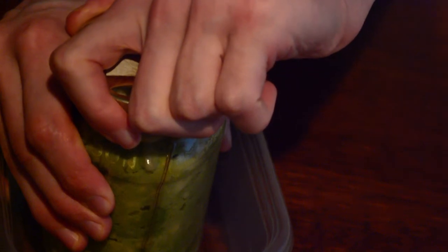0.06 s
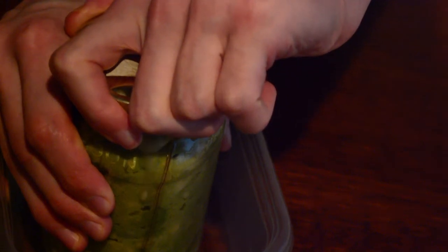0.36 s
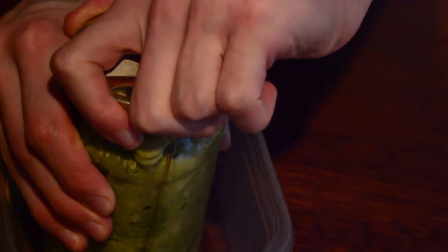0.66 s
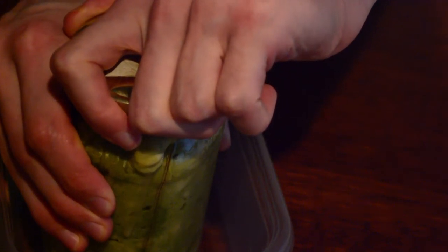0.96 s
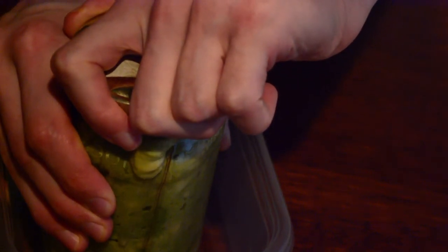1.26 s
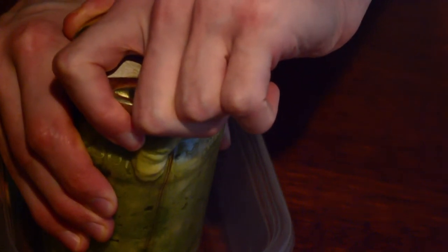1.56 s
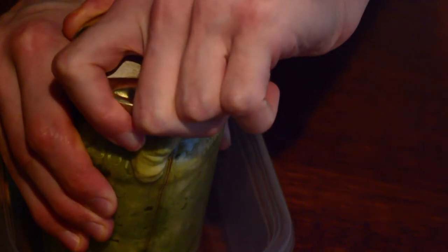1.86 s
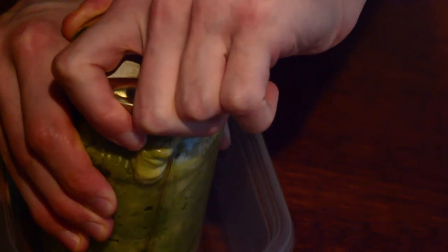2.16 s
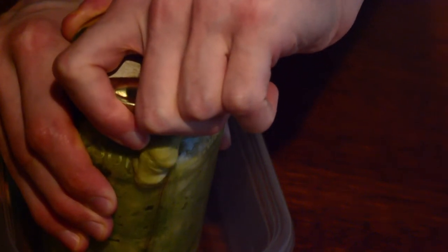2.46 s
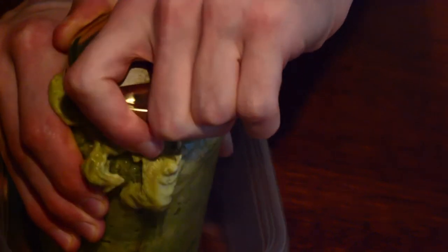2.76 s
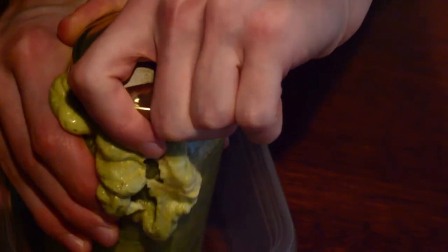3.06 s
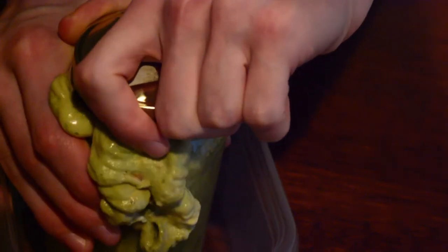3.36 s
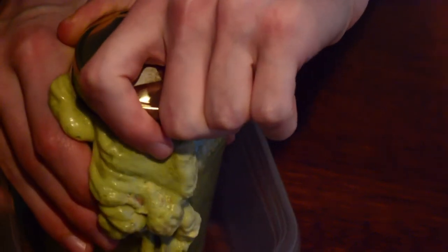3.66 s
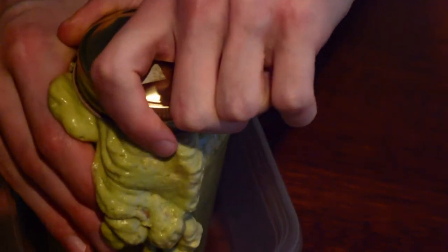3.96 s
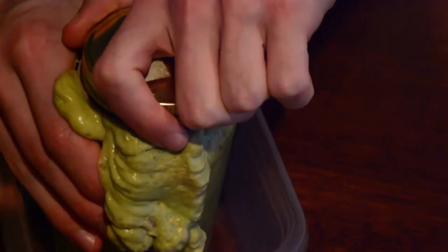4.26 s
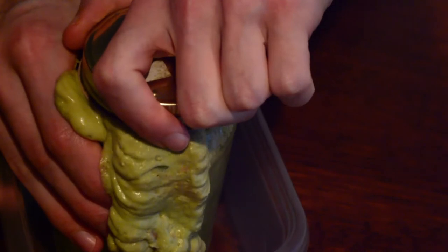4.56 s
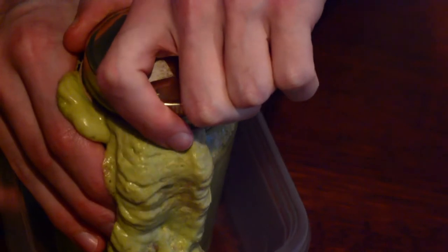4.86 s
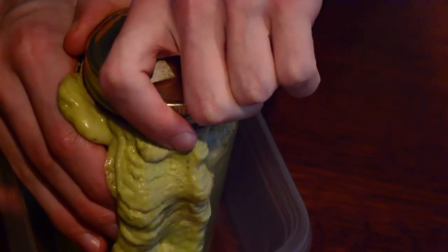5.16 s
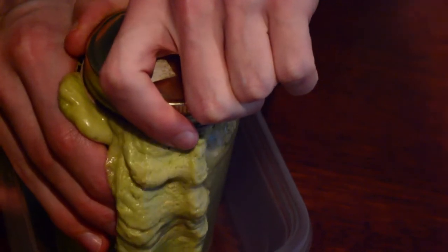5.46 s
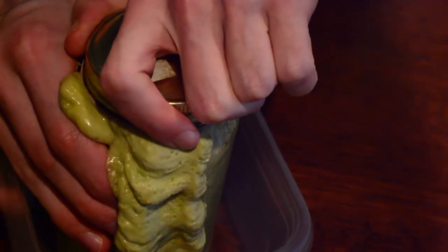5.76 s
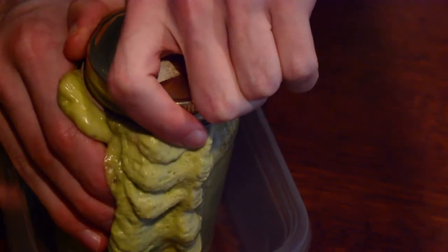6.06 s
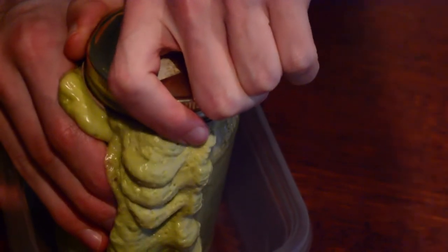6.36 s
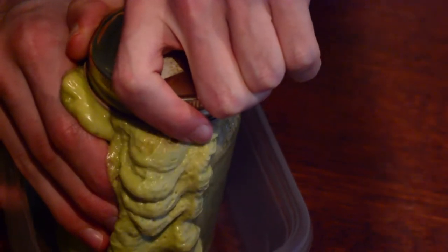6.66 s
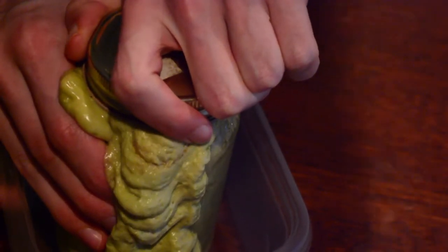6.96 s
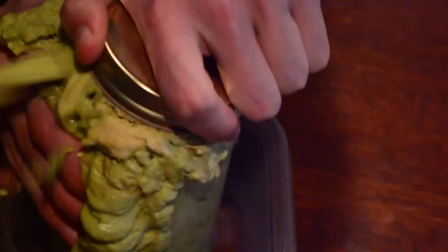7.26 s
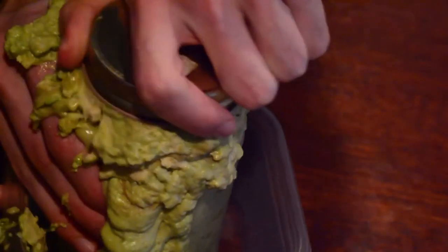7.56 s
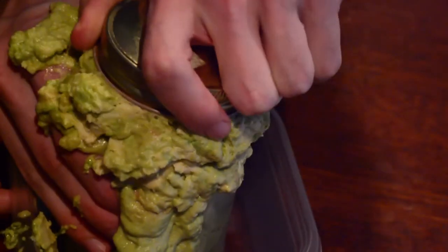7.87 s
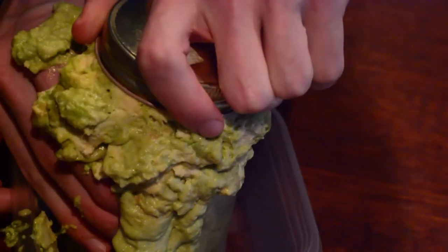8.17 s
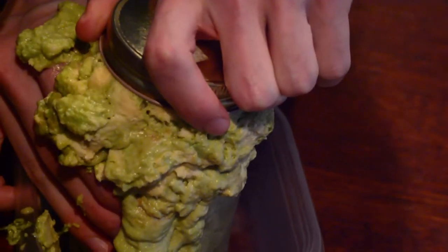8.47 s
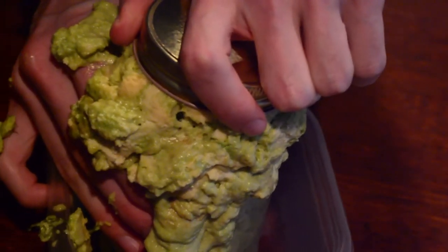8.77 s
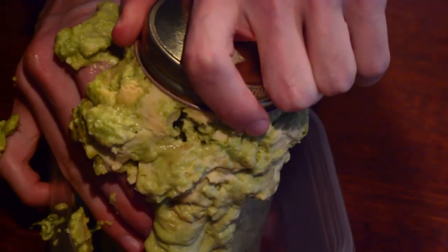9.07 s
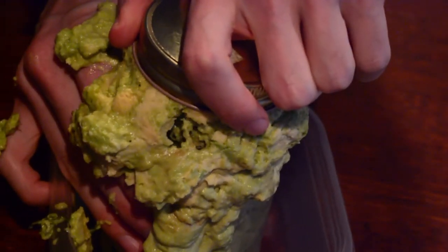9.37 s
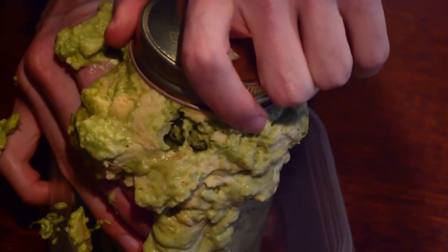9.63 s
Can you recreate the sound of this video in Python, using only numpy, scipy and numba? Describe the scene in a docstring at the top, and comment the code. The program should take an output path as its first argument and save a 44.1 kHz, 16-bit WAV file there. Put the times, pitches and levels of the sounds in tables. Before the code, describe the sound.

A jar of fermenting mash is eased open indoors, heard up close in stereo. Soft fizzing and chirping at the lid give way to irregular wet cracks and jets of spray, with quiet squelching between them. After a brief lull the seal lets go with a thump and a shower of splats. A few frothy puffs follow, then a faint scrape of glass on the table over a low room hum.

```python
"""A glass jar of fermenting mash on a table in a room, its metal lid eased open close to a stereo microphone.
First gas sputters through the wet thread and bubbles chirp past the seal. From about 2.6 s it spits
plugs of mash in sharp bursts while foam oozes and bubbles pop. At 7.1 s the seal blows with a thump,
mash spatters down and the last gas gushes through the foam. At 9.7 s the jar shifts on the table."""
import sys
import numpy as np
from scipy import signal
from scipy.fft import rfft, irfft
from scipy.io import wavfile
from scipy.ndimage import uniform_filter1d
from numba import njit

SR = 44100
rng = np.random.default_rng(int(sys.argv[2]) if len(sys.argv) > 2 else 0)


def int16_out(signal):
    """Quantize to a 16-bit WAV file."""
    q = np.round(np.clip(np.atleast_2d(signal).T, -1, 1) * 32767)
    wavfile.write(sys.argv[1], SR, q.astype(np.int16))


N = 432180
TIME = np.arange(N) / SR
BLOWOUT_S = 7.131   # the seal gives way

# plugs spat from under the lid: (time [s], crack [dB], spray [dB], stutter length [s], gap resonance [Hz])
SPITS = [(2.653, -30, -27, 0.057, 2620), (2.712, -26, -20, 0.035, 3550), (2.735, -25, -4.5, 0.025, 5000),
         (2.766, -23, -24, 0.021, 3000), (2.807, -21, -33, 0, 3730), (2.841, -24.5, -21, 0.004, 2930),
         (2.943, -28, -28, 0, 4140), (2.957, -28.5, -13.5, 0.022, 3640),
         (3.091, -24.5, -14.5, 0.0078, 4130), (3.305, -31.5, -38.5, 0.028, 2400),
         (3.350, -27.5, -16.5, 0.03, 2160), (3.529, -33, -24.5, 0.025, 4340),
         (4.221, -22, -17.5, 0.029, 3380), (4.262, -23.5, -14.5, 0.033, 2850),
         (4.309, -22.5, -19.5, 0.042, 3200), (5.002, -31.5, -49, 0.004, 3420),
         (5.329, -26.5, -29.5, 0, 3400), (5.463, -15, -3, 0.0092, 3860), (5.486, -20.5, -20, 0.051, 1930),
         (5.666, -31.5, -24, 0.022, 2900), (5.815, -30, -38, 0.015, 2270), (6.182, -41.5, -49, 0, 3000),
         (6.6995, -20, -13, 0.02, 3320)]
# mash flung onto hand and table, or squeezed; the blowout comes first: (time [s], level [dB], length [s])
SPLATS = [(7.1303, -9.5, 0.0037), (7.147, -19.5, 0.0045), (7.168, -27, 0.0026), (7.199, -23.5, 0.0017),
          (7.227, -22.5, 0.0039), (7.284, -31.5, 0.0035), (7.317, -28.5, 0.0043), (7.381, -28.5, 0.0031),
          (7.612, -44.5, 0.034), (7.665, -35.5, 0.027), (7.755, -36.5, 0.062), (8.651, -54.5, 0.065)]
# spectrum of gas in the gap under the lid: (frequency [Hz], level [dB])
GAP_COLOUR = [(200, -22), (350, -15), (900, -8.5), (1900, -3.5), (2250, -1.5), (2580, 4.5), (3100, -3.5),
              (5000, -8), (9000, -12)]
# spectrum of fine spray: (frequency [Hz], level [dB])
SPRAY_COLOUR = [(1500, -26), (4500, -5.5), (8000, -1.5), (12000, 2), (15500, -3.5)]
# spectrum of squelching mash: (frequency [Hz], level [dB])
SQUELCH_COLOUR = [(120, 4), (220, -10), (370, -3), (700, 0), (1650, 5.5), (3000, 0), (6000, -10),
                  (15000, -18)]


def from_db(db):
    return 10 ** (np.asarray(db) / 20)


def unit_rms(x):
    return x / np.sqrt(np.mean(x ** 2) + 1e-20)


def at_hz(points, hz):
    """Read a table on a log-frequency axis."""
    knots, values = np.transpose(points)
    return np.interp(np.log(hz + 1), np.log(knots), values)


def latest(times):
    """Index of the event that began last, at every sample."""
    return np.maximum(np.searchsorted(times, TIME) - 1, 0)


def butterworth(x, order, hz, kind):
    return signal.sosfilt(signal.butter(order, hz, kind, fs=SR, output="sos"), x)


def response(spectrum, size=4096):
    """Causal (minimum-phase) impulse response with the given gains."""
    hz = np.arange(size // 2 + 1) * SR / size
    cepstrum = irfft(np.log(from_db(at_hz(spectrum, hz))))
    cepstrum[1:size // 2] *= 2
    cepstrum[size // 2 + 1:] = 0
    return irfft(np.exp(rfft(cepstrum)))


def colour(x, spectrum):
    """Shape a white signal without changing its power."""
    taps = response(spectrum)
    return signal.oaconvolve(x, taps / np.linalg.norm(taps))[:N]


def bursts(times, levels_db, lengths, attack_s, release_s, sag_db_per_s=0):
    """Flow that opens, holds or sags for its length and dies as the gap closes."""
    flow = np.zeros(N)
    for s, db, length in np.broadcast(times, levels_db, lengths):
        span = slice(int(s * SR), int((s + length + 10 * release_s) * SR))
        age = TIME[span] - TIME[span][0]
        opening = 1 - np.exp(-age / attack_s)
        closing = np.exp(-np.maximum(age - length, 0) / release_s)
        flow[span] += from_db(db - sag_db_per_s * age) * opening * closing
    return flow


def crackle(per_s, spread_db, hiss, even_s):
    """Clicks of uneven size over a share of smooth hiss; rms near 1 over any stretch of even_s."""
    sizes = from_db(spread_db * np.minimum(rng.exponential(1, N), 4)) * rng.choice([-1, 1], N)
    clicks = unit_rms(sizes * (rng.random(N) < per_s / SR)) + hiss * rng.standard_normal(N)
    local_power = np.abs(uniform_filter1d(clicks ** 2, int(even_s * SR) + 2))
    return clicks / np.sqrt(local_power + 1e-6)


def flutter(depth_db, grain_s=0.002):
    """Hiss let through in soft, uneven puffs; rms 1."""
    size = int(grain_s * SR)
    gate = unit_rms(uniform_filter1d(uniform_filter1d(rng.standard_normal(N), size), size))
    return unit_rms(from_db(depth_db * np.minimum(gate, 2)) * rng.standard_normal(N))


def blips(times, levels_db, pitches, lengths, rise=0.16):
    """Each bubble swells and fades within a few cycles, its pitch rising by the given share."""
    out = np.zeros(N + SR)
    for s, db, hz, length, turn in np.broadcast(times, levels_db, pitches, lengths, rng.random(len(times))):
        progress = np.arange(int(length * SR)) / (length * SR)
        cycles = hz * length * (progress + rise * (progress - 0.5) ** 2 / 2)
        swell = from_db(db) * np.sin(np.pi * progress) ** 2
        start = int(s * SR)
        out[start:start + len(swell)] += swell * np.sin(2 * np.pi * (cycles + turn))
    return out[:N]


def froth(per_s, low_hz, high_hz, cycles=8, spread_db=3):
    """A cloud of bubbles, each with its own size and pitch; rms 1."""
    jitter, pitch, size = rng.random((per_s * N // SR, 3)).T
    times = (np.arange(len(jitter)) + jitter) / per_s
    levels_db = spread_db * np.minimum(-np.log(size), np.pi)
    hz = low_hz * (high_hz / low_hz) ** pitch
    return unit_rms(blips(times, levels_db, hz, cycles / hz))


@njit
def resonate(x, angle, radius):
    """A resonance whose centre moves, with even gain for noise."""
    y = np.zeros(len(x))
    for i in range(2, len(x)):
        y[i] = x[i] - x[i - 2] + 2 * radius * np.cos(angle[i]) * y[i - 1] - radius * radius * y[i - 2]
    return y


def hollow(x, hz, width_hz):
    """Pass a white signal through an air pocket of changing pitch, keeping its power."""
    radius = np.exp(-np.pi * width_hz / SR)
    return resonate(x, 2 * np.pi * hz / SR, radius) * np.sqrt((1 - radius ** 2) / 2)


def bubbly(x, low_hz, high_hz, width_hz, life_s):
    """Each bubble lends its own pitch for a moment before the next takes over."""
    bubble = np.cumsum(rng.random(N) < 1 / (life_s * SR))
    return hollow(x, low_hz * (high_hz / low_hz) ** rng.random(N)[bubble], width_hz)


def room_tone():
    """Low rumble and mains hum in the centre, with hiss spread wide across the channels."""
    # noise floor at the microphone: (frequency [Hz], level [dB])
    noise_floor = [(25, -30.5), (55, -4.5), (125, 3), (210, -17.5), (900, -14.5), (3000, -22.5),
                   (9500, -35), (11500, -17.5), (15500, -20)]
    mid, side = (colour(rng.standard_normal(N), noise_floor) for _ in range(2))
    side = from_db(-7.5) * side + butterworth(side, 1, 7000, "high")
    hum = from_db(-63.5) * np.sin(2 * np.pi * 60 * TIME) + from_db(-60.5) * np.sin(2 * np.pi * 120 * TIME)
    return from_db(-55) * (mid + side * [[1], [-1]]) + hum


def room(x, early=0.94, early_s=0.0043, build_s=0.0019):
    """Direct sound, strong early echoes off hands and table, then a diffuse tail that dies band by band."""
    # decay of the room: (frequency [Hz], reverberation time [s])
    decay_times = [(150, 0.64), (550, 0.66), (1400, 0.6), (3700, 0.51), (10000, 0.39), (15000, 0.17)]
    # the close capsules differ mostly in the treble: (frequency [Hz], side against mid [dB])
    stereo_width = [(4000, -42.5), (8000, -10.5), (12000, -3.5)]
    # strength of the echoes: (frequency [Hz], level [dB])
    echo_levels = [(150, 5.0), (600, 1.5), (2500, -4.5), (10000, -1.0)]
    age, tail = TIME[:SR], 0
    onset = (1 - np.exp(-age / build_s)) * (1 + early * np.exp(-age / early_s))
    edges = np.geomspace(40, 18000, 14)
    for low, high in zip(edges, edges[1:]):
        hz = np.sqrt(low * high)
        mid, side = butterworth(rng.standard_normal((2, SR)), 2, [low, high], "band")
        side_share = 1 / (1 + from_db(-at_hz(stereo_width, hz)) ** 2)
        pair = np.sqrt(1 - side_share) * mid + np.sqrt(side_share) * side * [[1], [-1]]
        fade = onset * from_db(-60 * age / at_hz(decay_times, hz))
        tail = tail + from_db(at_hz(echo_levels, hz)) * fade / np.linalg.norm(fade) * pair
    return x + signal.oaconvolve(x[None], tail, axes=1)[:, :N]


def microphone(pair, lag_s=3.5e-6):
    """Both capsules ring in the treble; the right one hears the jar duller and a hair later."""
    # the capsules peak in the top octave: (frequency [Hz], gain [dB])
    capsule_gains = [(8000, 1.5), (10000, -2), (11300, 15.5), (12300, 13.5), (14000, 9), (15800, 1)]
    # the right capsule points away from the jar: (frequency [Hz], gain [dB])
    off_axis_gains = [(4500, 0), (9000, -3.3)]
    left, right = (signal.oaconvolve(x, response(capsule_gains))[:N] for x in pair)
    hz = np.arange(N // 2 + 1) * SR / N
    off_axis = from_db(at_hz(off_axis_gains, hz)) * np.exp(-2j * np.pi * lag_s * hz)
    return np.array([left, irfft(rfft(right) * off_axis, N)])


def scuff(q=11):
    """The jar shifts on the table: a light knock, then a short judder that rings glass and wood."""
    # knock and judder: (time [s], level [dB], length [s])
    shifts = [(9.723, -50.5, 0.0064), (9.746, -43.5, .06)]
    # jar and table top as they rub: (frequency [Hz], level [dB])
    modes = [(490, -2.5), (690, -4), (1080, -5.5), (3520, -14.5)]
    motion = bursts(*np.transpose(shifts), attack_s=0.0008, release_s=0.0058)
    slips = crackle(per_s=500, spread_db=2, hiss=0.5, even_s=0.01)
    body = sum((-1) ** k * from_db(db) * hollow(slips, np.full(N, hz), hz / q)
               for k, (hz, db) in enumerate(modes))
    return motion * (body + from_db(-8) * colour(slips, SPRAY_COLOUR))


def ooze(creep_db=-75):
    """Foam creeps, and surges until its pressure is spent; bubbles squelch, gurgle or tick by size."""
    # surges of foam over the rim: (time [s], level [dB], length [s])
    surges = [(2.545, -47, 0.97), (3.817, -55, 0.9), (5.608, -52, 0.28), (6.12, -52.5, 0.16),
              (7.526, -41.5, 0.21)]
    flow = from_db(creep_db) + bursts(*np.transpose(surges), attack_s=0.056, release_s=0.21, sag_db_per_s=5)
    squelch = from_db(-6.5) * froth(per_s=110, low_hz=1185, high_hz=3000, spread_db=2.5)
    gurgle = from_db(-11.5) * froth(per_s=90, low_hz=500, high_hz=1082)
    fizz = from_db(-10) * colour(crackle(per_s=160, spread_db=4.5, hiss=0.3, even_s=0.15), SPRAY_COLOUR)
    wet_hiss = from_db(-2) * colour(flutter(depth_db=9.5), SQUELCH_COLOUR)
    return flow * (squelch + gurgle + wet_hiss + fizz)


def sputter(seep_db=-65, thread_full_s=2.6):
    """Gas fizzes through the wet thread in small bubbles and bursting films, coloured by the lid's gap."""
    # leaks through the thread: (time [s], level [dB], length [s])
    leaks = [(0.085, -43, 0.0029), (0.129, -41.5, 0.0086), (0.253, -42, 0.24), (0.538, -38.5, 0.071),
             (0.806, -44, 0.029), (1.043, -48, 0.11), (1.469, -51.5, 0.13), (2, -46, 0.033),
             (2.167, -52.5, 0.056), (2.435, -44, 0.11), (2.546, -44, 0.46)]
    seep = from_db(seep_db) * (TIME < thread_full_s)   # stops once mash fills the thread
    flow = bursts(*np.transpose(leaks), attack_s=0.0022, release_s=0.0038) + seep
    bubbles = from_db(-10) * froth(per_s=700, low_hz=1684, high_hz=7200)
    films = from_db(-5.5) * crackle(per_s=750, spread_db=3.5, hiss=0.3, even_s=0.03)
    return colour(flow * (films + bubbles), GAP_COLOUR)


def chirps(pocket_hz=2600, length_s=0.0065):
    """A bubble slips past the seal, sounds the pocket under the lid and lets out a wisp of gas."""
    # bubbles squeezing past the rubber seal: (time [s], level [dB])
    escapes = [(0.326, -28), (1.083, -43), (1.112, -32.5), (1.207, -39), (1.231, -37.5), (1.337, -39.5),
               (1.409, -45), (1.670, -39.5), (1.793, -40.5), (1.827, -40), (2.017, -34), (2.160, -43.5),
               (2.376, -43.5), (2.632, -28)]
    s, level_db = np.transpose(escapes)
    half_s = length_s / 2
    wisp = bursts(s, level_db, half_s, attack_s=half_s, release_s=half_s) * rng.standard_normal(N)
    return blips(s, level_db, pocket_hz, length_s) + from_db(-9) * colour(wisp, GAP_COLOUR)


def pops(gulp_hz=1755, gulp_s=0.002, gulp_over_crack_db=2.5):
    """Short notes of bursting bubbles, and the gulp of each plug coming unstuck."""
    # single bubbles bursting: (time [s], level [dB], pitch [Hz])
    bubbles = [(2.934, -26, 1940), (3.653, -38, 2530), (4.719, -35, 1870), (5.329, -20, 3140),
               (5.766, -35.5, 1430), (6.025, -35, 1790), (6.284, -36, 1480), (6.375, -34.5, 1800)]
    notes = blips(*np.transpose(bubbles), lengths=0.0036)
    spit_s, crack_db, *_ = np.transpose(SPITS)
    return notes + blips(spit_s, crack_db + gulp_over_crack_db, gulp_hz, gulp_s)


def gush(sink_octaves=0.42):
    """Once the seal is gone, frothy gas sounds a hollow in the foam; the pitch sinks as the hollow swells."""
    # puffs of gas through the foam: (time [s], level [dB], length [s], starting resonance [Hz])
    puffs = [(7.611, -36.5, 0.024, 640), (7.752, -25, 0.06, 1160), (8.095, -60, 0.15, 780),
             (8.639, -52, 0.14, 1620)]
    s, level_db, length, start_hz = np.transpose(puffs)
    puff = latest(s)
    progress = np.clip((TIME - s[puff]) / length[puff], 0, 2)
    hz = start_hz[puff] * 2 ** (-sink_octaves * progress)
    gas = hollow(crackle(per_s=900, spread_db=4, hiss=0.5, even_s=0.03), hz, width_hz=330)
    flow = bursts(s, level_db, length, attack_s=0.0021, release_s=0.02)
    return from_db(-8) * flow * butterworth(gas, 2, [330, 2600], "band")


def splats(lumps=18, rain_s=0.27, lump_s=0.0038, sag_db_per_s=17):
    """Mash slaps down after the blowout in a mist of fine spray; small lumps follow, ever weaker."""
    ages = (np.arange(lumps) + rng.random(lumps)) * rain_s / lumps
    rain = [(BLOWOUT_S + age, -33 - sag_db_per_s * age, lump_s) for age in ages]
    s, level_db, length = np.transpose([*SPLATS, *rain])
    wet = flutter(depth_db=2.5) + from_db(-15) * froth(per_s=300, low_hz=305.8, high_hz=1890)
    slaps = bursts(s, level_db, length, attack_s=0.0028, release_s=0.013) * wet
    mist = bursts(s, level_db, length, attack_s=0.001, release_s=0.0027)
    mist *= crackle(per_s=900, spread_db=5, hiss=0.3, even_s=0.03)
    return from_db(-2) * colour(slaps, SQUELCH_COLOUR) + from_db(-6.5) * colour(mist, SPRAY_COLOUR)


def thud(push_s=0.0059, recoil_db=-27, landing_db=-7.5):
    """A low, ringing thump, set off lightly by each spit and splat, hard by the blowout."""
    # low ringing of the thump and the room: (frequency [Hz], level [dB], time to fall 60 dB [s])
    modes = [(62, -25, .28), (134, -7, 0.13), (318.2, -16, 0.15), (634, -22.5, 0.25), (683, -26.5, 0.38)]
    recoils = [(s, spray_db + recoil_db) for s, _, spray_db, *_ in SPITS]
    landings = [(s, db + landing_db) for s, db, _ in SPLATS[1:]]
    kicks = np.zeros(N)
    for s, db in recoils + landings + [(BLOWOUT_S, 0)]:
        kicks[int(s * SR)] += from_db(db)
    age = TIME[:SR]
    ring = sum((-1) ** k * from_db(db - 60 * age / t60) * np.sin(2 * np.pi * hz * age)
               for k, (hz, db, t60) in enumerate(modes))
    return signal.oaconvolve(kicks, ring * (1 - np.exp(-age / push_s)))[:N]


def gap_openings(lead_s=0.0088, lead_db=-18.5, stutter_s=0.00908, max_flaps=16):
    """A plug leaks, lets go, then the gap flaps unevenly and weaker: (time [s], crack [dB], spray [dB])."""
    rows = []
    for s, crack_db, spray_db, length, _ in SPITS:
        ages = stutter_s * np.cumsum(0.5 + rng.random(max_flaps))
        scatter_db = 3.5 * rng.standard_normal(max_flaps)
        leak = (s - lead_s, crack_db + lead_db, spray_db + 2 * lead_db)
        flaps = [(s + age, crack_db - 6.5 + db, spray_db - 12 + db)
                 for age, db in zip(ages, scatter_db) if age < length]
        rows += [leak, (s, crack_db, spray_db), *flaps]
    return rows


def spits(open_s=0.0022, rise_octaves=0.7, rise_s=0.0024, jump_ratio=1.14):
    """Each plug lets go with a wet crack and a jet of spray; the gap rings and droplets trail behind."""
    # thin jets of gas and fine spray, with no plug: (time [s], level [dB], length [s])
    jets = [(2.781, -21.5, 0.0033), (3.794, -42.5, 0.032), (4.134, -44, 0.029), (4.46, -32, 0.0018),
            (4.908, -45, .02), (5.09, -35.5, 0.0033), (6.502, -38.5, 0.003)]
    # spectrum of a plug letting go: (frequency [Hz], level [dB])
    crack_colour = [(80, -12), (240, -20), (370, -4), (800, -4.5), (1600, -2.5), (3300, 0.5), (5500, -13.5),
                    (15000, -10.5)]
    s, crack_db, spray_db = np.transpose(gap_openings())
    crack = bursts(s, crack_db, open_s, attack_s=0.0024, release_s=0.0029)
    crack *= crackle(per_s=2200, spread_db=-0.5, hiss=1.0, even_s=0.0046)
    # the gap's resonance sweeps up as it opens, then jumps about as mash passes
    start, *_, gap_hz = np.transpose(SPITS)
    plug = latest(start)
    narrowness = np.exp(-np.abs(TIME - start[plug]) / rise_s)
    hz = gap_hz[plug] * 2 ** (-rise_octaves * narrowness)
    ring = bubbly(crack, low_hz=hz / jump_ratio, high_hz=hz * jump_ratio, width_hz=1150, life_s=0.0015)
    spray = bursts(s, spray_db, open_s, attack_s=0.0013, release_s=0.0014)
    spray += bursts(*np.transpose(jets), attack_s=0.0007, release_s=0.0051)
    spray *= crackle(per_s=2000, spread_db=2.5, hiss=0.38, even_s=0.0019)
    droplets = bursts(s, spray_db, open_s, attack_s=0.0017, release_s=0.0049)
    droplets *= crackle(per_s=400, spread_db=5, hiss=0.2, even_s=0.02)
    mist = colour(from_db(-7) * spray + from_db(-13) * droplets, SPRAY_COLOUR)
    return from_db(-3.5) * colour(crack, crack_colour) + ring + mist


def scene():
    """The jar close to the microphone, with the room's echo and tone behind it."""
    jar = sputter() + chirps() + spits() + pops() + ooze() + splats() + gush() + scuff()
    thump = thud()   # close and low: little of it feeds the diffuse echo
    return microphone(room(jar + from_db(-11) * thump) + thump) + room_tone()


def record(dry, cutoff_hz=15900):
    """The recorder rounds the highest peaks and cuts the top treble steeply."""
    rounded = 1.175 * np.tanh(dry / 1.248)
    return signal.sosfilt(signal.ellip(10, 0.1, 70, cutoff_hz, fs=SR, output="sos"), rounded)


dry = scene()
out = record(dry)
int16_out(out)
```